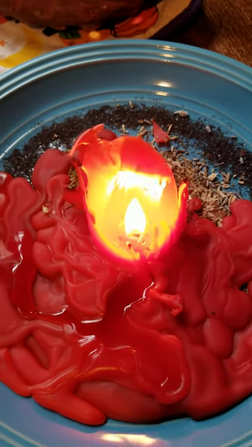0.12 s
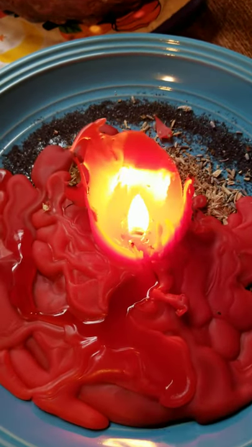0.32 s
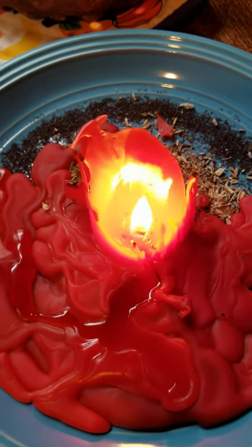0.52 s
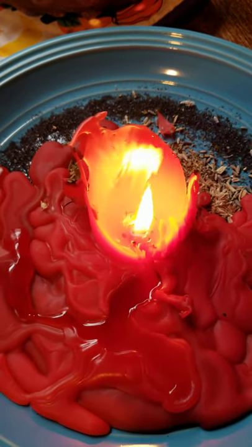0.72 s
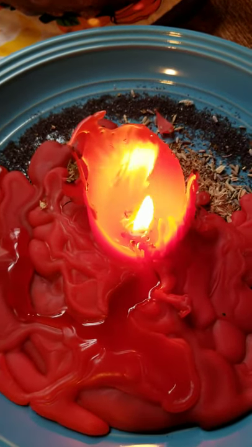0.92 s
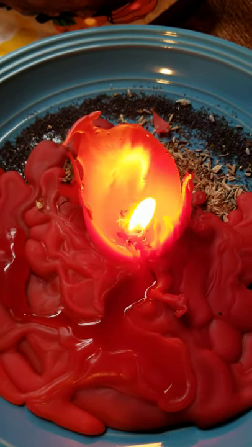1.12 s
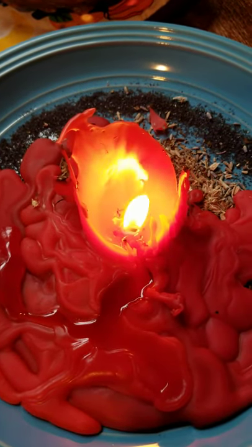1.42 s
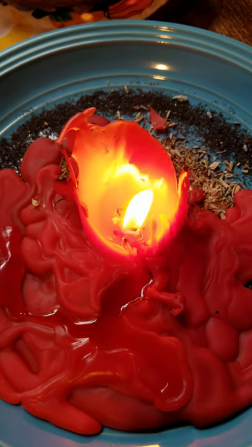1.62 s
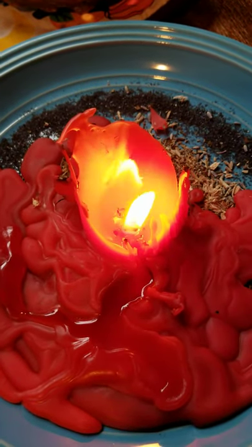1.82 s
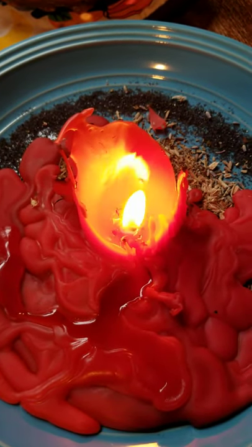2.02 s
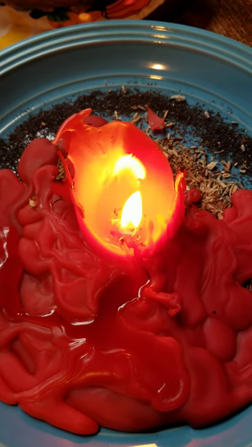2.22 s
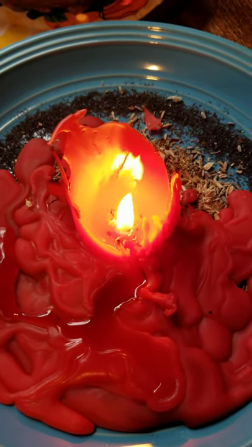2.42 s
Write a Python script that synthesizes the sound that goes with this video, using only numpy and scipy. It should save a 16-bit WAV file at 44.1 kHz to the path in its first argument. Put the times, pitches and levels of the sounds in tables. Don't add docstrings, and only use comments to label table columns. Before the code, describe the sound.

A candle wick sputters in melted wax: a quick snap, a short pause, sharp pops, then a dense crackling sizzle that thins to faint ticks. Very close stereo phone microphone in a quiet room with faint hiss.

```python
import sys
import numpy as np
from scipy import signal
from scipy.fft import rfft, irfft, next_fast_len
from scipy.io import wavfile
from scipy.ndimage import map_coordinates

SR = 44100
rng = np.random.default_rng(int(sys.argv[2]) if len(sys.argv) > 2 else 0)


def to_wav(s):
    ch = np.atleast_2d(s).T
    pcm = np.round(np.clip(ch, -1, 1) * 32767)
    wavfile.write(sys.argv[1], SR, pcm.astype(np.int16))


def how_loud(loudness_db):
    steps = np.asarray(loudness_db, float) / 20
    return 10 ** steps


N = 114660

# frequency in Hz, level in dB.
RUMBLE_HZ_DB = [(15, -38), (25, -39), (42, -3.5), (64, 5), (87, -9.5), (124, 1), (151, -7), (180, -18),
                (1200, -33), (1560, -68), (2640, -120)]
# frequency in Hz, level in dB.
HISS_HZ_DB = [(800, -25), (1400, -13), (2000, 0), (2500, -6), (3300, -7), (4700, -21), (9500, -26),
              (11800, -6), (16000, -9)]
# frequency in Hz, difference in dB.
HISS_LEFT_HZ_DB = [(700, .5), (1300, 4), (2100, 14), (2900, 12), (4400, 6), (8100, 7), (11000, 9),
                   (14000, 1)]
RUMBLE_DB, SELF_DB, PORTS_ALIKE = -62.5, -71, 0.89

# start in seconds, peak in dB, puff over click in dB.
OPENING = [
    (0.2379, -29, -23),
    (0.2416, -48, -51),
    (0.2412, -17.5, -40),
    (0.2437, -23.5, -37),
    (0.2451, -35, -50),
    (0.2464, -23, -39),
]
# start in seconds, peak in dB, puff over click in dB.
POPS = [(0.383, -22.5, -42.5), (0.411, -44.5, -20), (0.4677, -50, -21), (0.5617, -18, -28.5),
        (0.5677, -22.5, -18), (0.5807, -26, -15), (0.6224, -42, -12), (0.6383, -19, -30.5),
        (0.668, -35, -34), (0.67, -27, -31), (0.6695, -30, -43), (0.6746, -22, -24), (0.6757, -13, -39.5),
        (0.6857, -9, -45), (0.6957, -31.5, -18), (0.7013, -12.5, -30.5), (0.7155, -22, -21.5),
        (0.7272, -21, -16), (0.7375, -34, -21), (0.7698, -23, -24), (0.7918, -31, -17),
        (0.8024, -18.5, -32.5), (0.833, -15.5, -31)]
# start in seconds, peak in dB, puff over click in dB.
SPITS = [(0.8571, -32, -28), (0.8772, -24, -27), (0.8904, -25, -30), (0.9141, -26, -29), (0.9298, -16, -26),
         (0.9546, -31, -33), (0.977, -21, -26), (0.9857, -22.5, -30), (1.0266, -21, -32), (1.056, -25, -45),
         (1.09, -16, -33), (1.0999, -15.5, -33), (1.1168, -15, -31), (1.1428, -18, -33), (1.1667, -36, -36),
         (1.2398, -20.5, -22), (1.2438, -26.5, -31.5), (1.276, -30, -16), (1.297, -29, -28),
         (1.31, -22, -26), (1.3276, -31, -26), (1.359, -20, -29.5), (1.369, -22, -36), (1.3972, -42, -28),
         (1.4364, -25, -27), (1.4627, -23, -26), (1.484, -22, -27), (1.5007, -18, -28.5),
         (1.5355, -24, -29), (1.5607, -31, -28), (1.5723, -17.5, -25.5), (1.5811, -15, -24),
         (1.5985, -20, -15), (1.633, -31, -26), (1.6467, -28, -18), (1.6667, -24.5, -22),
         (1.6834, -18.5, -27), (1.6968, -18.5, -19), (1.704, -24, -27), (1.7193, -20.5, -31),
         (1.7274, -32, -28), (1.7514, -27, -22), (1.7912, -22, -24.5), (1.8373, -25, -8), (1.865, -18, -29),
         (1.8698, -18, -29), (1.8952, -22.5, -25), (1.9043, -24, -26), (1.918, -38, -29),
         (1.9348, -21.5, -24), (1.9515, -20.5, -28), (1.9821, -14.5, -35), (2.0076, -20, -29),
         (2.0356, -20, -26.5), (2.0427, -20, -32), (2.0521, -5, -33)]
# start in seconds, peak in dB, puff over click in dB.
LAST = [(2.088, -15.5, -40), (2.123, -37, -28), (2.128, -36, -24), (2.1574, -35, -40), (2.1686, -21, -24),
        (2.1743, -25, -22), (2.1831, -24.5, -31), (2.201, -34, -26), (2.2123, -21.5, -20),
        (2.2176, -22.5, -37), (2.2319, -16, -32), (2.2393, -22.5, -27), (2.249, -27, -49),
        (2.2627, -35, -25), (2.2671, -23, -22), (2.2723, -23, -24), (2.284, -35, -10), (2.2939, -28, -34),
        (2.3203, -26.5, -15), (2.3377, -34, -10), (2.376, -31.5, -26), (2.3841, -35, -40),
        (2.4138, -43, -32), (2.4329, -41.5, -29), (2.456, -39, -42), (2.46, -34, -44), (2.4688, -31.5, -47),
        (2.4857, -27.5, -43), (2.552, -43, -40)]
# frequency in Hz, gain in dB.
CLICK_HZ_DB = [(200, 8), (1000, 2.5), (3000, 9.5), (6000, 0.5), (12000, 7.5), (15500, -8.5)]
LEAD_S, CLICK_DB = 0.0011, 5
SPRAY_S, SPRAY_DB, SPRAY_SPREAD_DB, SPRAY_PER_WET_DB = .0025, -6, 5, .5
BODY_HZ, WET_OFFSET_DB, LEAN_PER_WET_DB = 2630, 27, 0.19
REBOUND_S, REBOUND_DB = 0.0013315, -18.5
SNAP_HZ, SNAP_DB = 9700, 5.5
FOAM_START_S, FOAM_END_S, FOAM_DB, FOAM_TOP_DB = .85, 2.36, -5, -19
PUFF_DB, PUFF_TOP_DB, PUFF_S, PUFF_HZ = 7.5, -24, 0.0031, 358
PUFF_SPREAD, PUFF_SAG_PER_DB = .2, .04

# time in seconds, level in dB.
BOIL_S_DB = [(.2, -88), (.26, -71.5), (.55, -79.5), (.66, -59.5), (.72, -46.5), (0.761, -66), (0.829, -63),
             (0.858, -39.5), (1.125, -41), (1.14, -45.5), (1.55, -45), (1.719, -40), (1.852, -49.5),
             (1.901, -40), (2.053, -41.5), (2.064, -58.5), (2.298, -46.5), (2.42, -66.5)]
# frequency in Hz, level in dB.
FLUTTER_HZ_DB = [(30, -35), (60, -7), (130, -0.5), (300, -4.5), (500, -5.5), (900, -5.5), (2000, -10)]
GRAINS_PER_S, GRAIN_SPREAD_DB, GRAIN_TOP_DB = 4500, 3.7, 17
CLUMP_DB, SWELL_DB, FIZZ_HISS_DB = 2.6, 1, -4
FLUTTER_DB, FLUTTER_LUMP_DB = -2.5, 1
FLUTTER_APART_HZ = 910

# frequency in Hz, gain in dB.
LEFT_HZ_DB = [(150, -9), (700, -4), (1400, -1.5), (4500, 3.5), (7000, -3), (10000, -4), (13000, -4),
              (15600, 7)]
# frequency in Hz, gain in dB.
RIGHT_HZ_DB = [(150, -8), (1300, -9), (2000, -1), (4000, -1.5), (5300, -11), (6300, -1.5), (8500, -11),
               (12500, 5)]
# frequency in Hz, width in Hz, gain as a ratio (negative = dip).
CUP_LEFT = [(1870, 550, -.8), (2740, 350, 1.1), (3800, 1050, -.75), (7440, 420, .6), (12000, 1300, .2)]
# frequency in Hz, width in Hz, gain as a ratio (negative = dip).
CUP_RIGHT = [(2480, 700, 1.7), (16600, 11800, -.45)]
# delay in ms, gain as a ratio.
ECHO_LEFT = [(.66, .15), (2.2, .1)]
# delay in ms, gain as a ratio.
ECHO_RIGHT = [(1.04, .5), (.51, .1)]
RIGHT_LAG_MS, WANDER_MS, ECHO_FROM_HZ = .14, .012, 6000
# frequency in Hz, width in Hz, share cancelled.
OPPOSED = [(2450, 180, .98), (3250, 290, .96)]
DRY_OPPOSED = .3
# frequency in Hz, T60 in seconds.
ROOM_HZ_S = [(200, .45), (1400, .3), (3700, .4), (10000, .3), (16000, .2)]
SCATTER_DB, SCATTER_T60_S, SCATTER_FROM_HZ, ROOM_DB = -7, .007, 4500, -19
LOW_HZ, TOP_HZ = 24.8, 16100


def unit(x):
    return x / np.sqrt(np.mean(x ** 2) + 1e-20)


def along(points, hz):
    f, v = np.transpose(points)
    return np.interp(np.log(hz + 1), np.log(f + 1), v)


def wobble(rate_hz):
    knots = rng.standard_normal(int(N * rate_hz / SR) + 4)
    return map_coordinates(knots, [np.arange(N) * rate_hz / SR])


def filtered(x, response):
    m = 2 * next_fast_len(N // 2 + SR // 4)
    return irfft(rfft(x, m) * response(np.fft.rfftfreq(m, 1 / SR)), m)[..., :N]


def causal(points, hz):
    cepstrum = irfft(np.log(how_loud(along(points, hz))))
    half = len(cepstrum) // 2
    return np.exp(rfft(np.r_[cepstrum[0], 2 * cepstrum[1:half], np.zeros(half)]))


def train(time_s, size):
    return np.bincount(np.clip(np.round(time_s * SR).astype(int), 0, N - 1), size, N)


def room_tone():
    def noise(points):
        return filtered(rng.standard_normal((3, N)), lambda f: how_loud(along(points, f)))

    low = noise(RUMBLE_HZ_DB)
    low = unit(PORTS_ALIKE * low[0] + np.sqrt(1 - PORTS_ALIKE ** 2) * low[1:])
    low = low * how_loud(0.17 * wobble(9.1))
    hiss = unit(noise(HISS_HZ_DB)[:2])
    hiss = filtered(hiss, lambda f: how_loud(np.outer([.5, -.5], along(HISS_LEFT_HZ_DB, f))))
    return how_loud(RUMBLE_DB + np.array([[1], [-1]])) * low + how_loud(SELF_DB) * hiss


def burst_list():
    start_s, peak_db, puff_db = np.transpose(OPENING + POPS + SPITS + LAST)
    foaming = (start_s > FOAM_START_S) & (start_s < FOAM_END_S)
    peak_db = np.where(foaming, np.minimum(peak_db, FOAM_TOP_DB), peak_db)
    return start_s + LEAD_S, peak_db, puff_db, foaming


def burst_clicks(droplets=14):
    start_s, peak_db, puff_db, foaming = burst_list()
    wet_db = np.clip(puff_db + WET_OFFSET_DB, -15, 3)
    snap = how_loud(peak_db + CLICK_DB + FOAM_DB * foaming)

    draw = rng.random((len(start_s), droplets, 3))
    after_s = -SPRAY_S * np.log(draw[..., 0])
    drop_s = (start_s[:, None] + after_s).ravel()
    drop_db = (peak_db + CLICK_DB + SPRAY_DB + SPRAY_PER_WET_DB * wet_db)[:, None]
    drop_db = drop_db - SPRAY_SPREAD_DB * (after_s / SPRAY_S + 2 * draw[..., 1])
    drop = how_loud(drop_db) * np.sign(draw[..., 2] - .5)

    def spray(gain):
        return train(start_s, gain * snap) + train(drop_s, (gain[:, None] * drop).ravel())

    def body(f):
        return BODY_HZ / (BODY_HZ + 1j * f)

    def wall(f):
        rebound = 1 + how_loud(REBOUND_DB) * np.exp(-2j * np.pi * f * REBOUND_S)
        return rebound * (1 + (how_loud(SNAP_DB) - 1) * 1j * f / (1j * f + SNAP_HZ))

    leans = how_loud(np.outer([-.5, .5], LEAN_PER_WET_DB * wet_db))
    clicks = [spray(lean) + filtered(spray(lean * (how_loud(wet_db) - 1)), body) for lean in leans]
    return filtered(np.array(clicks), wall)


def vapour_puffs():
    start_s, peak_db, puff_db, _ = burst_list()
    t = np.arange(SR // 20) / SR
    log_pitch = PUFF_SPREAD * rng.standard_normal(len(start_s)) - PUFF_SAG_PER_DB * (peak_db - FOAM_TOP_DB)
    hz = PUFF_HZ * np.exp(log_pitch)[:, None]
    level = how_loud(peak_db + np.minimum(puff_db, PUFF_TOP_DB) + PUFF_DB)[:, None]
    push = level * np.exp(-t / PUFF_S * hz / PUFF_HZ) * np.sin(2 * np.pi * hz * t)
    return train((start_s[:, None] + t).ravel(), push.ravel())


def sizzle():
    time_s, db = np.transpose(BOIL_S_DB)
    boil = how_loud(np.interp(np.arange(N) / SR, time_s, db) + SWELL_DB * wobble(24.79))
    clump_db = CLUMP_DB * wobble(190)

    draw = rng.random((3, 3, N))
    struck = draw[0] < GRAINS_PER_S / 3 / SR
    grain_db = np.minimum(-GRAIN_SPREAD_DB * np.log(draw[1]), GRAIN_TOP_DB)
    grains = struck * how_loud(grain_db) * np.sign(draw[2] - .5)
    fizz = unit(grains) + how_loud(FIZZ_HISS_DB) * rng.standard_normal((3, N))
    fizz = unit(how_loud(clump_db) * fizz) / np.sqrt(3)

    def breath(f):
        return how_loud(along(FLUTTER_HZ_DB, f)) * np.array([f ** 0, f / (f + FLUTTER_APART_HZ)])

    mid, side = filtered(rng.standard_normal((2, N)), breath)
    lumps = how_loud(FLUTTER_LUMP_DB * wobble(40.67) + 1.1 * clump_db)
    flutter = how_loud(FLUTTER_DB) * unit(np.array([mid + side, mid - side]) * lumps)
    return boil * fizz, boil * flutter


def port(x, colour, cup, echoes, lag_ms, shift_ms):
    def delay(f, ms):
        return np.exp(-2j * np.pi * f * ms / 1000)

    def path(f):
        ring = np.prod([1 + g * 1j * f * w / (c * c - f * f + 1j * f * w) for c, w, g in cup], axis=0)
        treble = f ** 2 / (f ** 2 + ECHO_FROM_HZ ** 2)
        echo = 1 + treble * sum(g * delay(f, ms + 2 * shift_ms) for ms, g in echoes)
        return causal(colour, f) * ring * echo * delay(f, lag_ms + shift_ms)

    return filtered(x, path)


def tail(x, t60_s, length):
    hz, t, z = signal.stft(rng.standard_normal((2, length)), SR, nperseg=64)
    h = signal.istft(z * how_loud(-60 * t / t60_s(hz)[:, None]), SR, nperseg=64)[1]
    return signal.fftconvolve(np.pad(x, ((0, 0), (40, 0))), h / np.linalg.norm(h[0]), axes=1)[:, :N]


def opposed(x):
    edges_s = np.repeat([FOAM_START_S, FOAM_END_S], 2) + [-.01, .01, -.01, .01]
    foam = np.interp(np.arange(N) / SR, edges_s, [DRY_OPPOSED, 1, 1, DRY_OPPOSED])
    return foam * filtered(x.mean(0), lambda f: sum(g * np.exp(-((f - c) / w) ** 4) for c, w, g in OPPOSED))


def scene():
    clicks, puffs = burst_clicks(), vapour_puffs()
    fizz, flutter = sizzle()
    spots = np.repeat(fizz[:, None], 2, axis=1)
    spots[1] += clicks
    spots = filtered(spots, lambda f: causal(CLICK_HZ_DB, f))
    near = np.zeros((2, N))
    for side, (left, right) in zip((-1, 0, 1), spots):
        shift_ms = side * WANDER_MS
        near[0] += port(left, LEFT_HZ_DB, CUP_LEFT, ECHO_LEFT, 0, shift_ms)
        near[1] += port(right, RIGHT_HZ_DB, CUP_RIGHT, ECHO_RIGHT, RIGHT_LAG_MS, -shift_ms)
    treble = filtered(near, lambda f: (1j * f / (1j * f + SCATTER_FROM_HZ)) ** 2)
    near = near + how_loud(SCATTER_DB) * tail(treble, lambda hz: SCATTER_T60_S + 0 * hz, length=1024)
    near = near - opposed(near)
    near = near + (puffs + flutter) * np.array([[how_loud(.7)], [how_loud(-.7)]])
    room = how_loud(ROOM_DB) * tail(near, lambda hz: along(ROOM_HZ_S, hz), length=SR // 2)
    return near + room + room_tone()


def low_pass(x):
    return signal.sosfilt(signal.butter(12, 17140, fs=SR, output="sos"), x)


def record(dry):
    def band(hz):
        return np.clip((TOP_HZ - hz) / 250, 0, 1) * (1j * hz / (1j * hz + LOW_HZ))

    mix = filtered(dry, band)
    return low_pass(mix)


dry = scene()
out = record(dry)
to_wav(out)
```